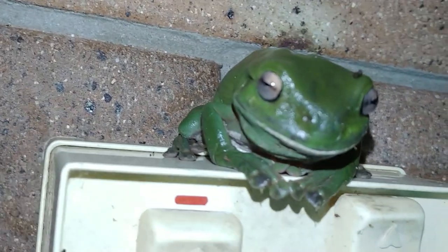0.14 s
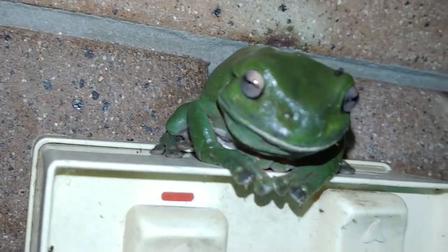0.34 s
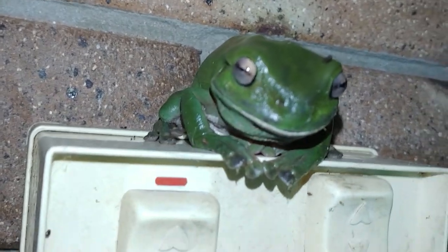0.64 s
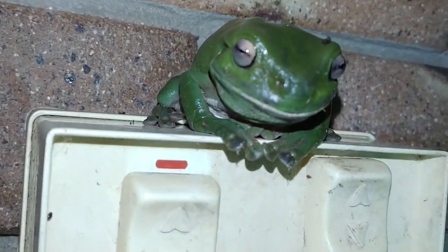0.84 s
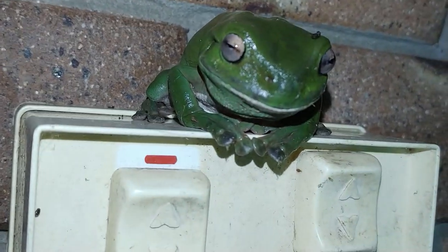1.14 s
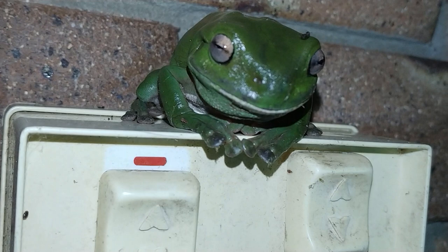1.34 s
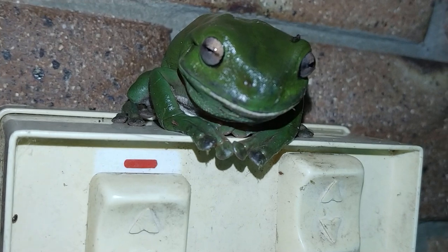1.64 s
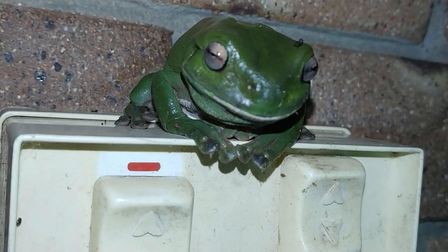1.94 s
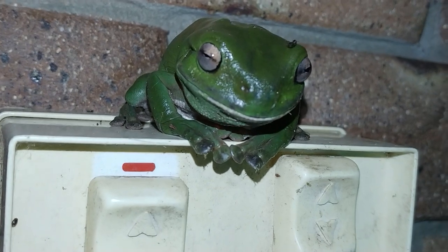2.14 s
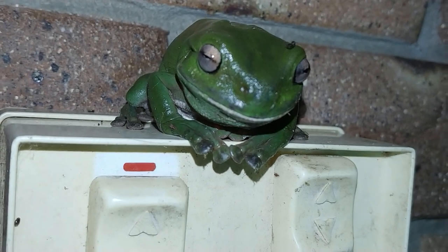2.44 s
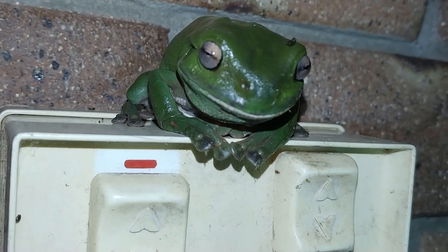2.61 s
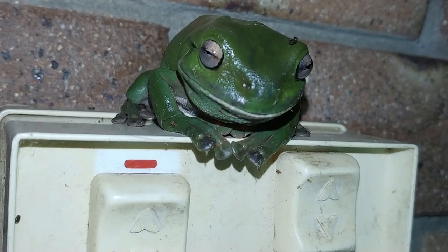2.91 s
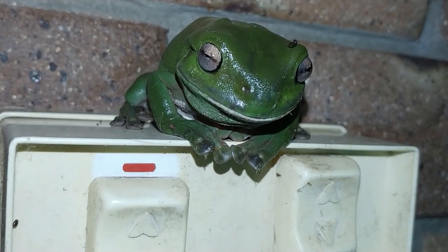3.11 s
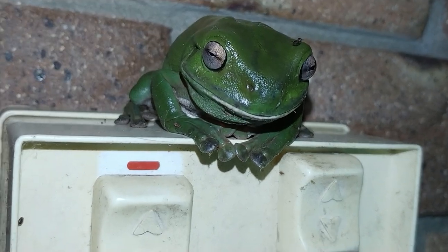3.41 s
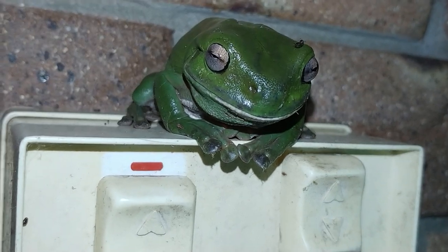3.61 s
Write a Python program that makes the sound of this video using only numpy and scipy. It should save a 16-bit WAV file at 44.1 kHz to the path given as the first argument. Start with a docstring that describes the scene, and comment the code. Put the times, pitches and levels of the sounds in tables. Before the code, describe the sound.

Crickets surge and insects buzz shrilly outdoors, over a low rumble and a small motor's whir.

```python
"""Night insects by a brick wall. From the start, wing strokes excite resonances: high buzzes swell and
break off on the right, and a cricket chorus surges on the left, while a camera's small motor whirs over
a low rumble. A bump at once sets the camera body ringing; then a faint cricket begins to chirp.
Near 0.5 s the level dips briefly. From 2.7 s it sinks for most of a second, during which
the motor rests and then runs more steadily."""
import sys
import numpy as np
from scipy import signal
from scipy.fft import rfft, irfft
from scipy.io import wavfile

SR = 44100
rng = np.random.default_rng(int(sys.argv[2]) if len(sys.argv) > 2 else 0)


def master_out(mix):
    """Clip the mix to full scale and print it as 16-bit PCM to the path in sys.argv[1]."""
    frames = np.transpose(np.atleast_2d(mix))
    ceiling = np.clip(frames, -1, 1)
    pcm = np.round(ceiling * 32767).astype(np.int16)
    wavfile.write(sys.argv[1], SR, pcm)


N = 165816
T, HZ = np.arange(N) / SR, np.fft.rfftfreq(N, 1 / SR)


def buzzes():
    """Stridulation: wing strokes drive a high resonance in calls that swell and stop short."""
    # start t/s, end t/s, swell t/s, f/Hz, width/Hz, stroke rate/Hz, full level/dB, left-right/dB
    calls = [(-2, 0.2, .85, 9300, 120, 180, -49, -2.5), (-.53, 0.507, 0.53, 8830, 200, 103, -46.5, -10.5),
             (-0.5, 0.71, 0.76, 9680, 140, 114, -63, 1), (-0.9, .95, 1.4, 8650, 80, 104, -53, -4),
             (.5, 1.88, 1.34, 9660, 170, 118, -59, -5), (0.07, 2.2, 1.35, 9220, 340, 108, -49.5, -5.5),
             (1.36, 2.62, 0.84, 8830, 175, 103, -46.5, -4.5), (1.84, 2.75, 0.45, 9740, 170, 140, -65, -3),
             (2.5, 4, 0.85, 9230, 200, 108, -49.5, -6), (3, 4, 0.27, 9710, 160, 114, -55.5, -15)]
    swell_db, edge_s = 20.5, 0.057
    out = np.zeros((2, N))
    for start, end, swell, hz, width, rate, db, side in calls:
        grown = np.clip((T - start) / swell, 0, 1)
        gate = np.clip(np.minimum(T - start, end - T) / edge_s + .5, 0, 1)
        wings = rasp(hz, width, rate, rough=0.53, jitter=0.0019, depth=0.28, steep=2.8)
        out += pan(side) * gate * amp(db - swell_db * (1 - grown)) * wings
    return out


def trills():
    """Forced vibration: unbroken wing strokes sustain a resonance at a steady level."""
    # f/Hz, width/Hz, stroke rate/Hz, level/dB, left-right/dB
    insects = [(8584, 180, 104, -54, -5), (8440, 150, 76, -65, -15)]
    return sum(pan(side) * amp(db) * rasp(hz, width, rate, rough=0.44, jitter=0.00168, depth=0.28, steep=5.6)
               for hz, width, rate, db, side in insects)


def chorus():
    """Incoherent superposition: many crickets blur into a band; a nearer group surges in step."""
    # surge peaks: t/s, level/dB
    surges = [(.05, -48.5), (0.321, -44.5), (.71, -45), (1.076, -43), (1.37, -60), (1.504, -47),
              (1.665, -54), (1.931, -45.5), (2.34, -45.5), (2.5, -65), (2.682, -46.5), (3.111, -45.5),
              (3.568, -48), (3.74, -54)]
    # resonances of the nearest crickets: f/Hz, relative level/dB
    resonances = [(4439, -7), (4563, -8), (4694, -14)]
    surge_sigma_s = 0.055
    flutter = amp(-53.5 + 1.5 * drift(40))
    crowd = flutter * ring(noise(), hz=4421, width_hz=500, steep=5.83)
    swell = sum(amp(db) * np.exp(-.5 * ((T - s) / surge_sigma_s) ** 2) for s, db in surges)
    near = rasp(hz=4462, width_hz=360, rate_hz=30.1, rough=1, jitter=0.203, depth=0.33, steep=4.4)
    notes = sum(amp(db) * ring(noise(), hz, width_hz=31, steep=3.25) for hz, db in resonances)
    return pan(8.5) * (crowd + swell * (amp(-2.5) * near + notes))


def chirps():
    """Amplitude modulation: one faint cricket gates its pulsed resonance into short chirps."""
    # chirp onsets: t/s, level/dB
    onsets = [(.29, -72), (.8, -73), (1.55, -68), (2.25, -68), (3.08, -70)]
    length_s, edge_s = .2, 0.026
    level = sum(amp(db) * np.clip(np.minimum(T - s, s + length_s - T) / edge_s, 0, 1) for s, db in onsets)
    wings = rasp(hz=7383, width_hz=150, rate_hz=61.4, rough=1, jitter=.02, depth=0.45, steep=3.9)
    return pan(3.2) * level * wings


def motor():
    """Rotation gives a tone with sidebands; unsteady running trades these for whines and rattle."""
    # course of the whir: t/s, relative level/dB, f/Hz, unsteadiness (0 is steady)
    course = [(0, 1, 1635, 1), (2.7, -0.5, 1635, 1), (2.895, -3, 1625, 0.77), (2.93, -33, 1625, 0.4),
              (3.05, -25, 1625, 0.34), (3.085, -1, 1625, 0.4), (3.17, 4, 1622, 0.31),
              (3.285, -2, 1610, 0.62), (3.37, 3.5, 1632, 0.32), (3.42, -4, 1655, .3), (3.46, 4, 1663, .1),
              (3.515, 7.5, 1663, 0.07), (3.55, -4, 1655, 0.64), (3.61, 0, 1635, 1.05)]
    # sidebands: offset/turn rate, relative level/dB
    offsets = [(-1.2, -5), (1, -6), (2.6, -21)]
    # weaker partials of constant pitch: f/Hz, relative level/dB
    partials = [(1260, -23), (1416, -21.5), (1486, -19), (1537, -15), (1561, -10), (1611, -10), (1737, -16),
                (1759, -15.5), (1927, -22)]
    turn_hz, wander_hz = 97.2, 14.42
    times, *columns = np.transpose(course)
    db, hz, unsteady = (np.interp(T, times, column) for column in columns)
    unsteady = np.clip(unsteady, 0, 1)
    pitch = hz + wander_hz * unsteady * drift(22.25)
    sidebands = sum(amp(level) * tone(pitch + k * turn_hz, unsteady) for k, level in offsets)
    whines = sum(amp(level) * tone(f, unsteady) for f, level in partials)
    rattle = rasp(hz=1657, width_hz=110, rate_hz=turn_hz, rough=0.98, jitter=.004, depth=.5, steep=1.75)
    whir = tone(pitch, unsteady) + (1 - unsteady) * sidebands
    whir += np.sqrt(unsteady) * (whines + amp(-3.5) * rattle)
    return pan(14) * amp(-55.5 + db) * whir


def bump():
    """Impulse response: a knock excites damped modes of the camera body, with a short rustle."""
    # body modes: f/Hz, level/dB, 60 dB decay t/s
    modes = [(195, -30, 0.046), (280, -20.5, 0.024), (826, -26, 0.016), (1200, -30, 0.014),
             (2680, -35.5, 0.0044)]
    onset_s, attack_s, rustle_s = .0452, 0.00049, 0.039
    t = np.maximum(T - onset_s, 0)
    lag_rad = np.array([[0], [1.72]])
    knock = sum(amp(db - 60 * t / t60) * np.sin(2 * np.pi * hz * t - lag_rad) for hz, db, t60 in modes)
    knock *= 1 - np.exp(-(t / attack_s) ** 2)
    rustle = ring(noise(), hz=210, width_hz=240, steep=1.63) * (t > 0) * np.exp(-t / rustle_s)
    return pan(-0.29) * knock + amp(-42.5) * rustle


def faint_ticks():
    """Transients: two very faint, short ticks of broadband noise near 0.5 s and 2.9 s."""
    # tick peaks: t/s, level/dB
    ticks = [(.483, -79), (2.897, -68)]
    sigma_s = 0.011
    level = sum(amp(db) * np.exp(-.5 * ((T - s) / sigma_s) ** 2) for s, db in ticks)
    return level * ring(noise(), hz=3000, width_hz=5000, steep=1.4)


def air():
    """Partial coherence: the two ears share only part of an uneven low rumble and hiss."""
    # spectral density: f/Hz, relative level/dB
    spectrum = [(20, -12.5), (38, -2.5), (65, 4), (130, -3), (250, -16), (420, -20), (700, -27),
                (1300, -27), (2500, -28.5), (3600, -33.5), (5200, -29.5), (6200, -75.5), (11000, -73)]
    # balance: f/Hz, left-right/dB
    balance = [(60, 7), (110, 7.0), (190, 15), (330, 17), (590, 12.5), (1050, 7.5), (1850, 1.5),
               (3280, 9.5), (5810, 15), (10300, -1)]
    # likeness of the ears: f/Hz, correlation
    likeness = [(30, 0.14), (80, 0.48), (160, 0.18), (300, -0.29), (600, -0.055), (1200, -0.08),
                (4000, 0.086)]
    left, independent = rfft(noise())
    same, side_db = read(likeness), read(balance) / 2
    right = same * left + np.sqrt(1 - same ** 2) * independent
    ears = np.array([left * amp(side_db), right * amp(-side_db)])
    rumble = unit_rms(irfft(ears * amp(read(spectrum)), N))
    return rumble * amp(-46.5 + .5 * drift(12))


def far_insects():
    """Random phases: countless distant calls sum to a high haze of noise."""
    # spectral density: f/Hz, relative level/dB
    spectrum = [(20, -75), (6400, -60.5), (7100, -20), (7900, -13), (8500, 5.5), (9100, 4.5), (9800, -17),
                (10250, -18), (10700, -54)]
    haze = unit_rms(irfft(rfft(noise()) * amp(read(spectrum)), N))
    return amp(-54) * pan(-7) * haze


def rasp(hz, width_hz, rate_hz, rough, jitter, depth, steep):
    """Source and filter: pulses and scraping drive a resonance; rough is the scrape's share of power."""
    strokes = np.cumsum(rate_hz * (1 + jitter * drift(24.9))) / SR + rng.random()
    strokes = strokes + rng.uniform(0, .2, (2, 1))  # each ear has its own path
    offset_samples = (strokes % 1 - .5) * SR / rate_hz
    pulses = np.sinc(offset_samples) * np.exp(-(offset_samples / 10) ** 2)
    clean = ring(scatter(pulses), hz, width_hz, steep)
    friction = np.exp(-depth * np.cos(2 * np.pi * strokes)) * noise()
    scrape = ring(friction, hz, width_hz, steep)
    return np.sqrt(1 - rough) * clean + np.sqrt(rough) * scrape


def tone(hz, unsteady):
    """Random modulation: a partial slips in phase, and flickers in level when the motor is unsteady."""
    cycles = np.cumsum(hz * np.ones(N)) / SR + rng.random()
    slip_rad, lag_rad = 0.65 * drift(14.7), np.array([[0], [1]])
    flicker_db = 1.46 * unsteady * drift(22)
    return np.sqrt(2) * amp(flicker_db) * np.sin(2 * np.pi * cycles + slip_rad - lag_rad)


def scatter(x, decay_s=0.0075):
    """Diffuse reflection: wall and yard add a short spray of echoes, different for each ear."""
    t = T[:4096]
    tail = rng.standard_normal((2, len(t))) * np.exp(-t / decay_s)
    tail /= np.linalg.norm(tail[0])
    return x + amp(-0.5) * signal.fftconvolve(x, tail, axes=1)[:, :N]


def ring(x, hz, width_hz, steep):
    """Resonance: a band at unit rms whose skirts fall as detuning to the power -steep."""
    response = (1 + ((HZ - hz) / width_hz) ** 2) ** (-steep / 2)
    return unit_rms(irfft(rfft(x) * response, N))


def drift(hz):
    """Low-pass noise: slow random motion at unit rms."""
    return unit_rms(irfft(rfft(rng.standard_normal(N)) * np.exp(-(HZ / hz) ** 2), N))


def noise():
    """White noise, uncorrelated between the ears."""
    return rng.standard_normal((2, N))


def pan(db):
    """Interaural level difference at constant power; positive is left."""
    return unit_rms(amp([[db / 2], [-db / 2]]))


def read(points):
    """Interpolation over the spectrum on a log-frequency axis."""
    f, value = np.transpose(points)
    return np.interp(np.log(HZ + 1), np.log(f + 1), value)


def amp(db):
    """Decibels to amplitude ratio."""
    return 10 ** (np.asarray(db) / 20)


def unit_rms(x):
    """Normalisation to unit power."""
    return x / np.sqrt(np.mean(x ** 2) + 1e-20)


def scene():
    """Linear superposition: the pressures of all sources add."""
    insects = buzzes() + trills() + chorus() + chirps()
    return insects + motor() + air() + far_insects() + bump() + faint_ticks()


def record(dry):
    """Time-varying attenuation: the level dips, the bass less so; a low-pass then limits the band."""
    # gain above the bass: t/s, level/dB
    dips = [(.47, -0.5), (.505, -5), (.545, -1), (2.0, 0), (2.71, 0), (2.765, -10), (2.805, 1),
            (2.855, -8.5), (2.895, -2), (2.935, -10.5), (3.555, -8), (3.595, -1)]
    bass_hz, bass_dip_share, cutoff_hz = 110, 0.45, 10700
    dip_db = np.interp(T, *np.transpose(dips))
    bass = irfft(rfft(dry) / (1 + (HZ / bass_hz) ** 4), N)
    dipped = bass * amp(bass_dip_share * dip_db) + (dry - bass) * amp(dip_db)
    low_pass = signal.firwin(511, cutoff_hz, window=("kaiser", 9), fs=SR)
    return signal.oaconvolve(dipped, low_pass[None], "same")


dry = scene()
out = record(dry)
master_out(out)
```